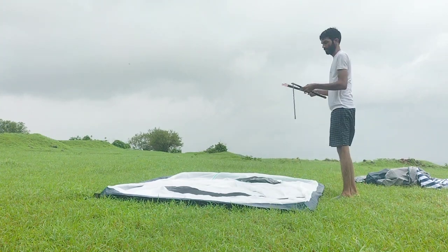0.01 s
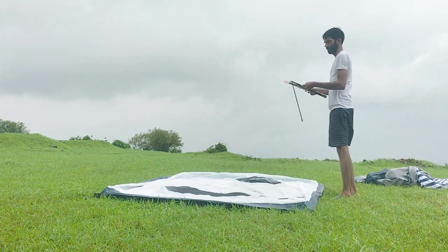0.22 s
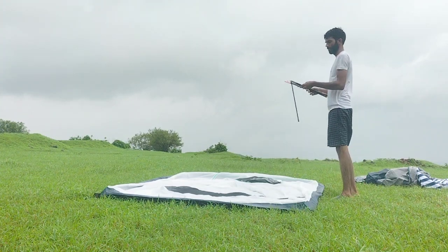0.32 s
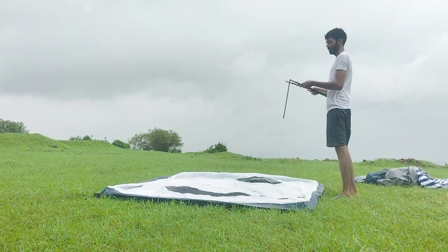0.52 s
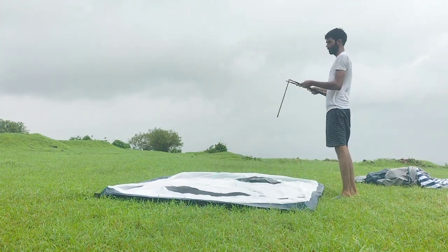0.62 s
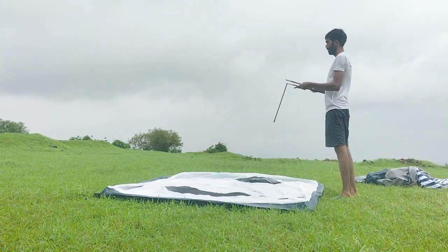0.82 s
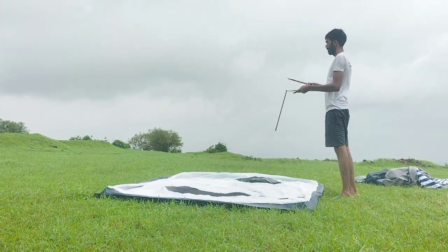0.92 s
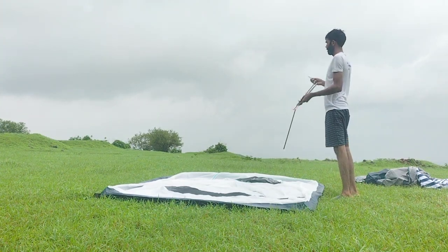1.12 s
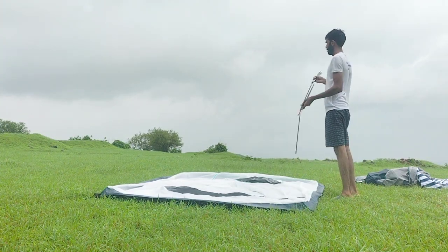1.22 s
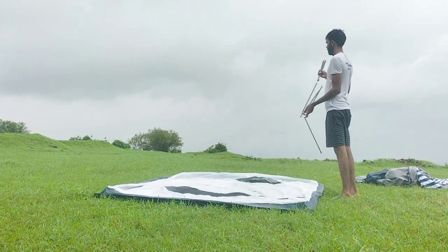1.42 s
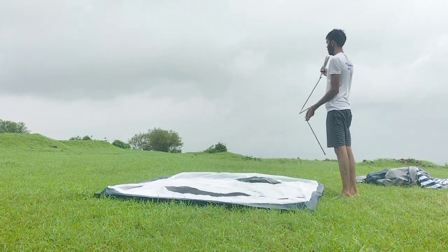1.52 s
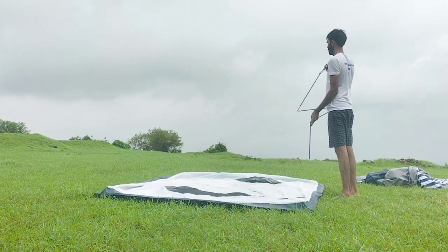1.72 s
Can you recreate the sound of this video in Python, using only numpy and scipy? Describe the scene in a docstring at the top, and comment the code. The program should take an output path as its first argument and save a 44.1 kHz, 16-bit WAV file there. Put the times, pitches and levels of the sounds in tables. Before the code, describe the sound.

Outdoors in a hushed field, a soft object lands with a muffled, bumpy thud, then loose pole sections tick lightly and one clicks sharply home; a distant bird chirps late, with no room echo.

```python
"""A quiet outdoor hush with soft puffs of wind, both coloured noise, lasts throughout, in a field.
Something soft lands with a dull, tumbling thump: rounded pushes ring a body and scuff its cover.
Its fabric settles as a swell of noise, and loose tent pole sections tick as short scratches and rings.
Between these ticks, one section snaps into its ferrule: choked sine waves, a scrape and a noisy tail.
Some way off a small bird twitters in quick gliding tones."""
import sys
import numpy as np
from scipy import signal
from scipy.fft import rfft, irfft
from scipy.io import wavfile

SR = 44100
rng = np.random.default_rng(int(sys.argv[2]) if len(sys.argv) > 2 else 0)


def dump(signal):
    """Clip the signal to [-1, 1] and save it as 16-bit WAV at the path in sys.argv[1]."""
    limited = np.clip(np.atleast_2d(signal).T, -1, 1)
    pcm = np.round(limited * 32767).astype(np.int16)
    wavfile.write(sys.argv[1], SR, pcm)


N = 79380   # length in samples
T = np.arange(N) / SR   # time in seconds


def from_db(db):
    """Turn decibels into gain."""
    return 10 ** (np.asarray(db) / 20)


def noise(spectrum):
    """Noise of rms 1, coloured by a table of frequency (Hz) and relative level (dB)."""
    hz, db = np.transpose(spectrum)
    f = np.maximum(np.arange(N // 2 + 1) * SR / N, 1)
    colour = from_db(np.interp(np.log(f), np.log(hz), db))
    white = rng.standard_normal(N)
    x = irfft(rfft(white) * colour * (f > 15), N)   # nothing below 15 Hz
    return x / x.std()


def dying(start, time_constant, attack):
    """Envelope that rises quickly at start and dies away; all times in seconds."""
    age = np.maximum(T - start, 0)
    return (1 - np.exp(-age / attack)) * np.exp(-age / time_constant)


def choked(start, length):
    """Envelope that swells to a peak and is then quickly stifled; length sets its time scale."""
    u = np.maximum(T - start, 0) / length
    return 2 * u * np.exp(-np.minimum(u, 20) ** 2)


def resonance(x, hz, t60):
    """Two-pole resonance with gain 1 at its pitch; its ring falls by 60 dB in t60 seconds."""
    r = np.exp(-np.log(1000) / (t60 * SR))
    feed = np.array([1, 0, -1]) * (1 - r * r) / 2
    feedback = [1, -2 * r * np.cos(2 * np.pi * hz / SR), r * r]
    return signal.lfilter(feed, feedback, x + 1e-18)   # the tiny offset avoids vanishingly small numbers


# Colour of the outdoor hush. Each row: frequency in Hz, relative level in dB per Hz.
HUSH_COLOUR = [(25, -17), (50, -7.5), (90, 1), (300, -0.5), (450, -5), (700, -12.5), (1200, -9),
               (1900, -17.5), (2700, -13), (3300, -17.5), (4000, -14.5), (4700, -28.5), (7000, -40.5),
               (7800, -50), (11000, -53), (16000, -61.5)]
# Light wind buffets. Each row: middle in seconds, half length in seconds, level in dB.
WIND_PUFFS = [(.005, 0.0079, -50.5), (0.663, 0.028, -49.5), (0.75, 0.045, -54.5), (1.683, 0.041, -49.5),
              (1.78, 0.039, -54)]
# Colour of the wind. Each row: frequency in Hz, relative level in dB.
WIND_COLOUR = [(25, -14), (50, 0), (85, 1.5), (140, 0.5), (250, -11), (2000, -83)]
HUSH_DB = -56.5


def air():
    """Steady hush of the field, plus low wind noise that swells and fades in puffs."""
    gusts = sum(from_db(db) * np.exp(-((T - s) / half) ** 2) for s, half, db in WIND_PUFFS)
    return from_db(HUSH_DB) * noise(HUSH_COLOUR) + gusts * noise(WIND_COLOUR)


# Soft contacts of the tumbling thing. Each row: middle of the push in seconds, peak level of that
# push alone in dB, pitch in Hz (lower is softer).
CONTACTS = [(0.2039, -22.5, 203.4), (0.2135, -15.5, 316), (0.223, -19, 240), (0.2285, -21, 396),
            (0.2315, -17.5, 196), (0.2421, -14.5, 271), (0.2570, -19.5, 212), (0.2615, -25, 350),
            (0.2664, -14, 232), (0.2791, -24.5, 149), (0.2894, -28, 234), (0.2982, -25, 263),
            (0.3124, -26.5, 141.7), (0.3253, -28, 116), (0.3517, -35, 137), (0.374, -21.5, 225.4),
            (0.393, -33.5, 130), (0.413, -38.5, 114), (0.4486, -47, 86)]
# Low ring of the thumped body. Each row: pitch in Hz, gain on the pushes in dB,
# time to fall by 60 dB in seconds.
BODY_RINGS = [(63.4, 7.5, 0.38), (122.8, 8, 0.15), (180, -2.5, 0.066), (215.6, 1, 0.083),
              (353.6, -3.5, 0.1276), (486.5, -1.5, 0.13)]
# Colour of the scuffing cover. Each row: frequency in Hz, relative level in dB.
SCUFF_COLOUR = [(30, -22), (60, -4), (200, 6), (460, -4.5), (560, -8), (700, -11.5), (950, -26),
                (5000, -105)]
PUSH_CYCLES = 0.67   # half length of one push, in cycles of its pitch
SCUFF_DB, SCUFF_S = -15, 0.005   # level relative to the contacts, time constant in seconds
SCUFF_HZ = 260   # contacts firmer than this pitch scuff more, softer ones less


def thump():
    """Each soft contact radiates a rounded push, rings the body and scuffs its cover."""
    pushes, rubbing = 0, 0
    for s, db, hz in CONTACTS:
        cycles = hz * (T - s)
        push = np.cos(2 * np.pi * cycles) * np.exp(-(cycles / PUSH_CYCLES) ** 2)
        pushes = pushes + from_db(db) * push
        firmness = (hz / SCUFF_HZ) ** 2
        # rubbing starts half a cycle before the middle of the push
        rubbing = rubbing + from_db(db) * firmness * dying(s - .5 / hz, SCUFF_S, attack=0.00054)
    body = sum(from_db(db) * resonance(pushes, hz, t60) for hz, db, t60 in BODY_RINGS)
    return pushes + body + from_db(SCUFF_DB) * rubbing * noise(SCUFF_COLOUR)


# Colour of the settling fabric. Each row: frequency in Hz, relative level in dB.
FABRIC_COLOUR = [(500, 0), (2700, -0.5), (4000, -6.5), (10000, -55)]
RUSTLE_S, RUSTLE_HALF_S, RUSTLE_DB = 0.36, 0.13, -62.5   # middle (s), half length (s), level (dB)


def rustle():
    """A faint swell of fabric noise as the soft thing settles."""
    swell = np.exp(-((T - RUSTLE_S) / RUSTLE_HALF_S) ** 2)
    return from_db(RUSTLE_DB) * swell * noise(FABRIC_COLOUR)


def grainy(depth_db):
    """Gain of rms 1 that jumps about every millisecond or two, as surfaces catch and slip."""
    wander = np.clip(noise([(500, 0), (1500, -40)]), -2, 2)
    gain = from_db(depth_db * wander)
    return gain / np.sqrt(np.mean(gain ** 2))


def rung(contact, hz, t60):
    """A resonance set off by a rough contact, scaled to peak 1."""
    x = resonance(rng.standard_normal(N) * contact, hz, t60)
    return x / np.abs(x).max()


# Touches of the loose sections. Each row: start in seconds, scratch level in dB before its envelope,
# time scale of the contact in seconds, knock pitch in Hz, knock peak in dB, ring pitch in Hz,
# ring peak in dB.
TOUCHES = [(0.3824, -51, 0.0018, 3890, -50.5, 6120, -67), (0.502, -60.5, 0.0079, 4230, -62, 5640, -60),
           (0.9714, -54.5, 0.0066, 1410, -48, 3700, -55), (1.093, -72, 0.0066, 890, -53, 6620, -62.5),
           (1.1364, -59.5, 0.0022, 940, -43, 8800, -70), (1.371, -65, 0.0078, 4100, -64, 6000, -65),
           (1.618, -55, 0.0051, 2350, -50, 4870, -58)]
# Colour of the scratches. Each row: frequency in Hz, relative level in dB.
SCRATCH_COLOUR = [(500, -17.5), (2400, 8), (5800, -7), (6900, -13.5), (9500, -23), (11700, -16),
                  (12800, -33), (15500, -32)]
TICK_GRAIN_DB = 6.5   # how unevenly the scratch catches
KNOCK_T60_S, TUBE_T60_S = 0.01, 0.018   # the knock dies sooner than the ring
TUBE_HZ, TUBE_DB = 11430, 7.5   # thin ring of the tube walls: pitch, gain on the scratches


def ticks():
    """Light touches between sections: a grainy scratch, a short knock and the ring of the section."""
    scratch = noise(SCRATCH_COLOUR) * grainy(TICK_GRAIN_DB)
    scratches, bodies = 0, 0
    for s, db, length, knock_hz, knock_db, ring_hz, ring_db in TOUCHES:
        contact = choked(s, length)
        scratches = scratches + from_db(db) * scratch * contact
        knock = from_db(knock_db) * rung(contact, knock_hz, KNOCK_T60_S)
        ring = from_db(ring_db) * rung(contact, ring_hz, TUBE_T60_S)
        bodies = bodies + knock + ring
    return scratches + bodies + from_db(TUBE_DB) * resonance(scratches, TUBE_HZ, TUBE_T60_S)


# Ring of the pole, choked by the hands. Each row: pitch in Hz, level in dB before its envelope,
# time scale in seconds.
POLE_RINGS = [(168, -46, 0.008), (398, -35, 0.0044), (730, -39, 0.0027), (1550, -21.5, 0.0023),
              (2050, -30, 0.0023), (3545, -27, 0.0027), (4010, -35, 0.003), (4920, -45.5, 0.0035),
              (5430, -40.5, 0.0025), (5900, -37.5, 0.0024), (6730, -37.5, 0.00149), (7985, -45.5, 0.0013),
              (9149, -55.5, 0.0021), (11770, -58, 0.0025)]
# Colour of the metal scrape. Each row: frequency in Hz, relative level in dB.
SCRAPE_COLOUR = [(100, -1), (800, -21), (2000, -2), (5000, -4), (9000, -11), (12200, -1), (14000, -20),
                 (15500, -9)]
# Colour of the sound scattered by the ground. Each row: frequency in Hz, relative level in dB.
GROUND_COLOUR = [(150, 1), (400, 5), (900, -5), (1600, 11), (4000, -5), (7000, -13), (12000, -36),
                 (16000, -48)]
SNAP_S = .9846   # the ferrule seats (s)
# The levels below, in dB, are taken before the envelopes.
SCRAPE_DB, SCRAPE_S = -52, 0.0019   # metal on metal: level, time scale (s)
AFTER_RING_HZ, AFTER_RING_DB, AFTER_RING_S = 3660, -51, 0.015   # free end: pitch, level, time constant (s)
GROUND_DB, GROUND_S = -46.5, .011   # scattered tail: level, time constant (s)


def snap():
    """The ferrule scrapes home, the pole rings very briefly and the ground scatters a faint tail."""
    age = T - SNAP_S
    modes = sum(from_db(db) * np.sin(2 * np.pi * hz * age) * choked(SNAP_S, length)
                for hz, db, length in POLE_RINGS)
    scrape = from_db(SCRAPE_DB) * noise(SCRAPE_COLOUR) * choked(SNAP_S + 0.0006, SCRAPE_S)
    after_tone = np.sin(2 * np.pi * AFTER_RING_HZ * age)
    after = from_db(AFTER_RING_DB) * after_tone * dying(SNAP_S, AFTER_RING_S, attack=0.002)
    tail = from_db(GROUND_DB) * noise(GROUND_COLOUR) * dying(SNAP_S, GROUND_S, attack=0.00075)
    return modes + scrape + after + tail


# Notes of the bird. Each row: start in seconds, length in seconds, first, middle and last pitch in Hz,
# level in dB before dulling, flutter and echo.
BIRD_NOTES = [(1.018, 0.014, 6430, 5800, 4930, -59.5), (1.116, 0.0245, 4200, 4500, 5230, -62),
              (1.414, 0.024, 7000, 5200, 3240, -57), (1.453, 0.0045, 3920, 4730, 6300, -55.5),
              (1.46, 0.016, 6400, 5130, 3700, -56), (1.496, 0.0205, 3250, 3680, 4450, -50),
              (1.516, 0.018, 4500, 5040, 5340, -47.5), (1.539, 0.0086, 3700, 4200, 3380, -55),
              (1.549, 0.013, 5070, 3700, 3080, -55.5)]
BIRD_DULL_HZ = 5220   # air and foliage soften the song above this pitch
BIRD_FLUTTER_DB = 2.5   # the song flickers on its way through the air: rms depth
BIRD_ECHO_S, BIRD_ECHO_DB = 0.016, -10.5   # foliage scatters the song: time constant (s), level


def bird():
    """Quick pure glides, each swelling and fading along an arc of pitch, with a faint diffuse echo."""
    song = 0
    for s, length, first, middle, last, db in BIRD_NOTES:
        u = np.clip((T - s) / length, 0, 1)   # progress through the note
        arc = np.polyfit([0, .5, 1], [first, middle, last], 2)
        hz = np.polyval(arc, u)
        dulling = np.sqrt(1 + (hz / BIRD_DULL_HZ) ** 12)
        swell = np.abs(np.sin(np.pi * u)) ** 0.77 / dulling
        song = song + from_db(db) * swell * np.sin(2 * np.pi * np.cumsum(hz) / SR)
    song = song * from_db(BIRD_FLUTTER_DB * noise([(150, 0), (400, -60)]))
    foliage = rng.standard_normal(N) * dying(0, BIRD_ECHO_S, attack=0.0035)
    echo = signal.fftconvolve(song, foliage / np.linalg.norm(foliage))[:N]
    return song + from_db(BIRD_ECHO_DB) * echo


def scene():
    """All sources in open air, without a room, as one channel."""
    return (thump() + rustle() + snap() + ticks() + bird() + air())[None]


CUTOFF_HZ = 15600


def record(dry):
    """A steep low-pass filter removes the top of the treble."""
    low_pass = signal.ellip(8, .1, 80, CUTOFF_HZ, fs=SR, output="sos")
    return signal.sosfilt(low_pass, dry)


dry = scene()
out = record(dry)
dump(out)
```